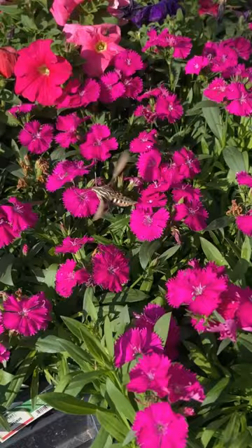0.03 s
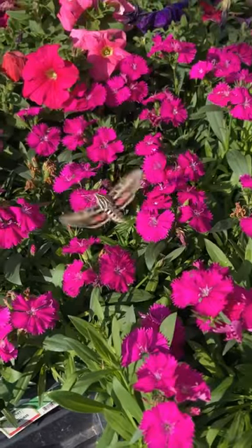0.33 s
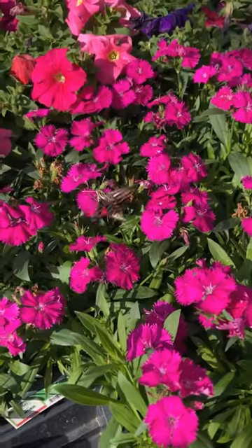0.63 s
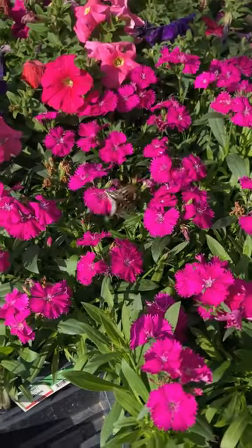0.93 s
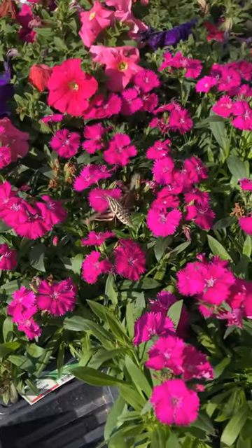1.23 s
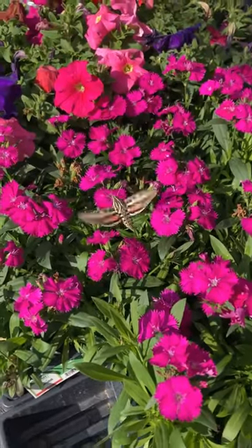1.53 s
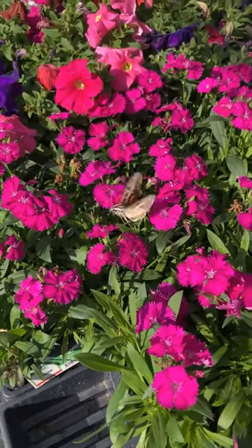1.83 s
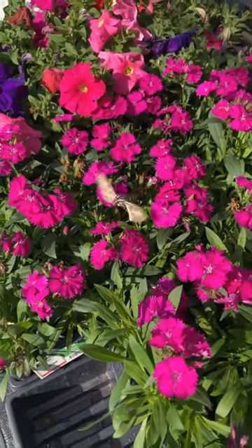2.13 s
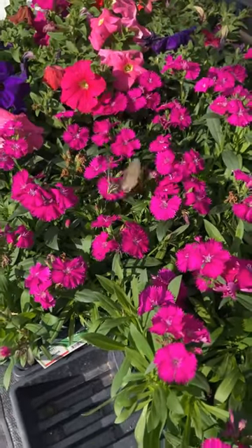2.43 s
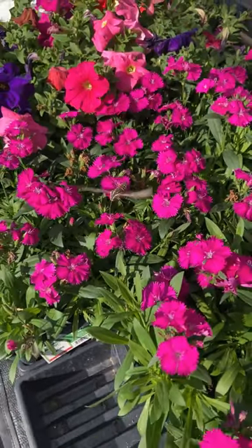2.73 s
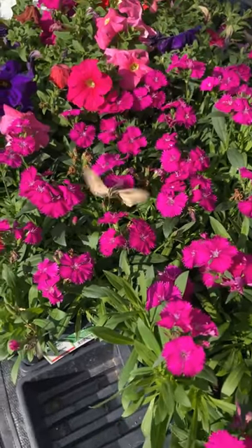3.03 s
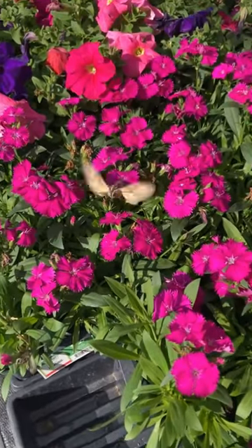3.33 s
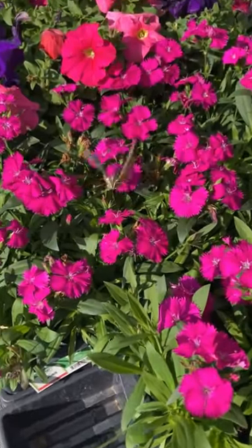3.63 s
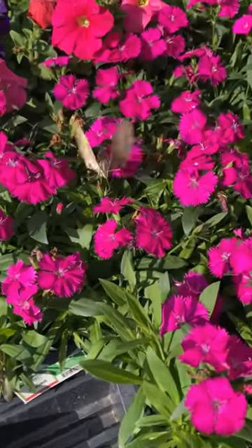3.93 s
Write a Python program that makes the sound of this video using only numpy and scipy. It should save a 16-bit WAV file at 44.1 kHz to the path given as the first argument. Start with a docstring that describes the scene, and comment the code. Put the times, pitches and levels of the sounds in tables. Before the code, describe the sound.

Distant engines drone over low traffic rumble, with faint leaf rustles close by.

```python
"""Flower bed within earshot of a road.

Mono microphone outdoors, close to the leaves, which stir and brush with friction noise and tiny snaps.
Far off, one engine slowly gains speed while another pulls away and levels off; their exhaust tones
throb against each other over a wavering machine hum. Traffic rumble and tyre hiss lie underneath,
and a very faint electrical whine holds its pitch."""
import sys
import numpy as np
from scipy import signal
from scipy.io import wavfile

SR = 44100
rng = np.random.default_rng(int(sys.argv[2]) if len(sys.argv) > 2 else 0)


def to_wav(sig):
    """Store sig (one row per channel, or 1-D mono) as 16-bit WAV at the path in sys.argv[1].

    Samples outside -1..1 are clipped; the rate is SR.
    """
    pcm = np.clip(np.atleast_2d(sig), -1, 1) * 32767
    pcm = np.round(pcm).astype(np.int16)
    wavfile.write(sys.argv[1], SR, pcm.T)  # frames by channels


N = 176400
CUTOFF_HZ = 15800


def from_db(db):
    """Decibels to gain."""
    return 10 ** (np.asarray(db) / 20)


def rms_one(x):
    """Scale to an rms of 1."""
    return x / np.sqrt(np.mean(x ** 2) + 1e-20)


def in_time(rows):
    """Rows of (t/s, values...) to one curve per value column, sample by sample."""
    times, *columns = np.transpose(rows)
    return [np.interp(np.arange(N) / SR, times, column) for column in columns]


def drift(rate_hz):
    """A smooth random wander of rms 1, mostly slower than rate_hz."""
    hop, settle = 40, 2000
    pole = np.exp(-2 * np.pi * rate_hz * hop / SR)
    white = rng.standard_normal(N // hop + settle + 2)
    slow = signal.lfilter([1], [1, -2 * pole, pole * pole], white)[settle:]
    return np.interp(np.arange(N) / hop, np.arange(len(slow)), rms_one(slow))


def banded_noise(spectrum, flicker_db, flicker_hz):
    """Third-octave bands of noise, each with its own level and flicker; rms 1 in all."""
    hz, db = np.transpose(spectrum)
    edges = 20 * 2 ** (np.arange(31) / 3)
    white = rng.standard_normal((2, N + SR // 2))
    out = 0
    for k, (low, high) in enumerate(zip(edges, edges[1:])):
        bandpass = signal.butter(2, [low, high], "band", fs=SR, output="sos")
        band = signal.sosfilt(bandpass, white[k % 2])[-N:]
        band_db = np.interp(np.log(low * high) / 2, np.log(hz), db)
        out += band * from_db(band_db + flicker_db * drift(flicker_hz))
    return rms_one(out)


def tone(hz):
    """A sine of rms 1 that follows a pitch curve."""
    return np.sqrt(2) * np.sin(2 * np.pi * np.cumsum(hz) / SR)


def fading_partials(hz, partials, fade_db=1.5, fade_hz=2.14):
    """Overtones of a firing rate, each fading in and out on its way to the microphone."""
    return sum(tone(k * hz) * from_db(db + fade_db * drift(fade_hz)) for k, db in partials)


def climbing_engine():
    """Exhaust tones of a distant engine, rising with its firing rate as it slowly gains speed."""
    # firing rate: t/s, f/Hz
    firing_rate = [(0, 59.3), (1.1, 62.3), (1.7, 64.2), (2.2, 65.8), (3, 68.6), (3.5, 70.3), (4, 71.9)]
    # exhaust: t/s, firing tone level/dB, octave level/dB, upper overtone level/dB
    levels = [(0, -32, -40, -59), (1.05, -30.5, -35, -64), (1.5, -49, -42, -50.5), (2.1, -42, -42, -52.5),
              (2.7, -28.5, -48, -61.5), (3.2, -25.5, -40.5, -57.5), (3.6, -24.5, -33.5, -61),
              (4, -22, -40, -69)]
    # upper overtones: multiple of the firing rate, relative level/dB
    overtones = [(3, 2), (5, -17.5), (6, -3), (7, -3.5), (8, -6.5)]
    hz, = in_time(firing_rate)
    firing, octave, upper = from_db(in_time(levels))
    return firing * tone(hz) + octave * tone(2 * hz) + upper * fading_partials(hz, overtones)


def pulling_engine():
    """A second distant engine revs up, then holds its speed and drones at four times its firing rate."""
    # firing rate: t/s, f/Hz
    firing_rate = [(0, 40), (.8, 45), (1.25, 54), (1.6, 61), (1.95, 63.5), (2.5, 63.8), (3.2, 64.2),
                   (4, 64.3)]
    # exhaust: t/s, firing tone level/dB, overtone level/dB, drone level/dB
    levels = [(0, -52, -65, -42), (.85, -50, -54, -48), (1.25, -27.5, -41.5, -46.5),
              (1.6, -22.5, -28.5, -50.5), (2.0, -20.5, -31, -56), (2.28, -33, -34.5, -39),
              (2.8, -30.5, -30.5, -39.5), (3.2, -28, -32, -40.5), (3.7, -23.5, -31, -39),
              (4, -19, -35.5, -44.5)]
    # overtones: multiple of the firing rate, relative level/dB
    overtones = [(1.5, -5.5), (2, -0.5), (2.5, -25), (3.5, -22.5), (5, -30.5)]
    hz, = in_time(firing_rate)
    firing, upper, drone = from_db(in_time(levels))
    return firing * tone(hz) + upper * fading_partials(hz, overtones) + drone * tone(4 * hz)


def machine_hum():
    """A low machine hum behind the engines, wavering in pitch and level."""
    # course of the hum: t/s, f/Hz, level/dB
    course = [(0, 99.5, -31), (.4, 99.8, -33.5), (1.15, 102, -30.5), (1.55, 100.4, -29),
              (1.95, 99.44, -32.5), (2.5, 100.8, -29), (2.9, 100.6, -36), (3.3, 101, -30.5),
              (3.7, 100.2, -36), (4, 95.96, -24)]
    # its partials: multiple of the pitch, relative level/dB
    partials = [(.8, -10), (1, 1.5), (1.8, -20.5), (3, -35.5)]
    hz, level_db = in_time(course)
    return from_db(level_db) * sum(from_db(db) * tone(k * hz) for k, db in partials)


def road():
    """Rumble and tyre hiss of traffic on the far road."""
    # rumble spectrum: f/Hz, relative level/dB
    rumble_spectrum = [(20, -52), (35, -16), (55, 4.5), (80, 1), (115, 3.5), (150, -2.5), (190, -1.5),
                       (240, -6), (300, -10.5), (420, -19.5), (600, -26), (1200, -52)]
    # swell of the rumble: t/s, level/dB
    rumble_level = [(0, -36), (.9, -36.5), (1.5, -35), (2.7, -33), (3.2, -33), (4, -32.5)]
    # tyre hiss spectrum: f/Hz, relative level/dB
    hiss_spectrum = [(150, -11), (450, -6), (680, 0), (850, 2), (1100, 0.5), (1500, -2.5), (2000, 0),
                     (3100, -11), (5000, -14), (7500, -24), (12000, -48), (16000, -42)]
    # swell of the hiss: t/s, level/dB
    hiss_level = [(0, -48.5), (.55, -48.5), (1.6, -49.5), (3.2, -48.5), (3.7, -50), (4, -48)]
    rumble = banded_noise(rumble_spectrum, flicker_db=1.07, flicker_hz=3.5)
    hiss = banded_noise(hiss_spectrum, flicker_db=1.38, flicker_hz=7.1)
    return from_db(in_time(rumble_level)[0]) * rumble + from_db(in_time(hiss_level)[0]) * hiss


def stirring_leaves():
    """Foliage stirs softly close to the microphone."""
    # foliage spectrum: f/Hz, relative level/dB
    spectrum = [(1000, -46), (2200, 5), (3500, -0.5), (5100, 7.5), (7000, -2.5), (9000, -4.5), (12000, -13),
                (16000, -26)]
    # swell of the stirring: t/s, level/dB
    level = [(0, -55.5), (.55, -63.5), (1, -67.5), (1.8, -66.5), (2.15, -60), (2.3, -56), (2.45, -54),
             (2.6, -57), (3, -60), (3.27, -52.5), (3.45, -56), (3.75, -58), (4, -55.5)]
    return from_db(in_time(level)[0]) * banded_noise(spectrum, flicker_db=1.85, flicker_hz=11)


def electrical_whine():
    """Thin, very faint electrical tones, steady in pitch."""
    # tones of the whine: f/Hz, level/dB
    tones = [(4120, -64.5), (7920, -78.5), (8000, -82), (8080, -73)]
    # their common swell: t/s, gain/dB
    swell = [(0, -6), (1.4, -4.5), (2.8, -2), (4, -6.5)]
    return from_db(in_time(swell)[0]) * sum(from_db(db) * tone(np.full(N, hz)) for hz, db in tones)


def brushing_leaves(width_octaves=1.4, snaps_per_s=2000):
    """Nearby leaves brush in short bursts of friction noise and tiny snaps, in equal parts."""
    # brushes: peak t/s, level/dB, rise time constant/s, decay time constant/s, centre f/Hz
    brushes = [(.29, -62, 0.0035, .008, 14500), (1.755, -63, 0.0092, .015, 8500),
               (3.101, -42.5, 0.02, 0.034, 3740), (3.515, -49, .007, 0.027, 8200),
               (3.92, -46.5, 0.021, .05, 3542)]
    t = np.arange(N) / SR
    edge_ratio = 2 ** (width_octaves / 2)
    out = 0
    for peak_s, db, rise, decay, hz in brushes:
        snaps = rms_one((rng.random(N) < snaps_per_s / SR) * rng.standard_normal(N))
        friction = rng.standard_normal(N)
        edges = [hz / edge_ratio, min(hz * edge_ratio, CUTOFF_HZ + 2000)]
        bandpass = signal.butter(2, edges, "band", fs=SR, output="sos")
        brush = rms_one(signal.sosfilt(bandpass, friction + snaps))
        falloff = np.maximum((peak_s - t) / rise, (t - peak_s) / decay)
        out += from_db(db) * brush * np.exp(-np.minimum(falloff, 20))
    return out


def scene():
    """Everything as heard from one spot at the flower bed, in mono."""
    background = climbing_engine() + pulling_engine() + machine_hum() + road()
    return (background + stirring_leaves() + electrical_whine() + brushing_leaves())[None]


def record(dry, start_s=0.031, fade_in_s=0.003):
    """The microphone channel opens after a moment; the top treble is cut steeply."""
    opening = np.clip((np.arange(N) / SR - start_s) / fade_in_s, 0, 1)
    lowpass = signal.ellip(12, .2, 70, CUTOFF_HZ, fs=SR, output="sos")
    return signal.sosfilt(lowpass, dry * opening)


dry = scene()
out = record(dry)
to_wav(out)
```